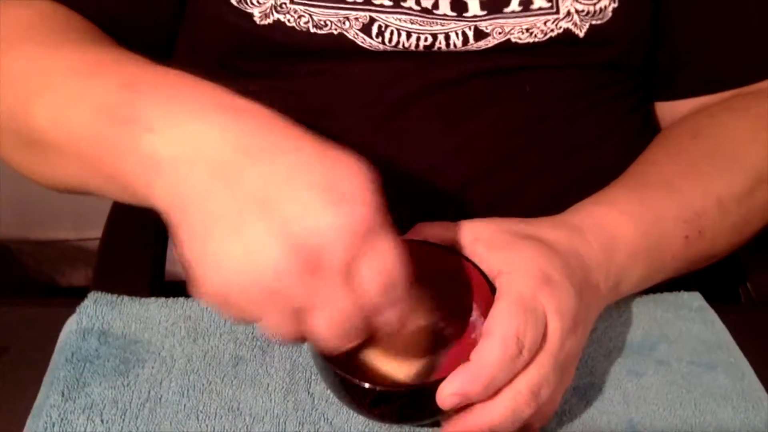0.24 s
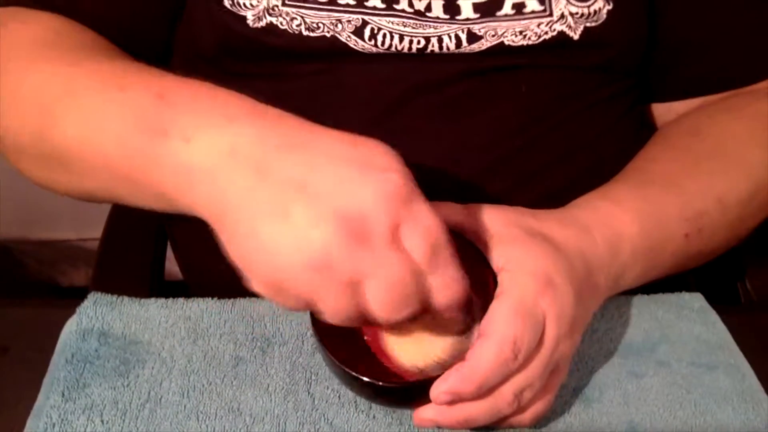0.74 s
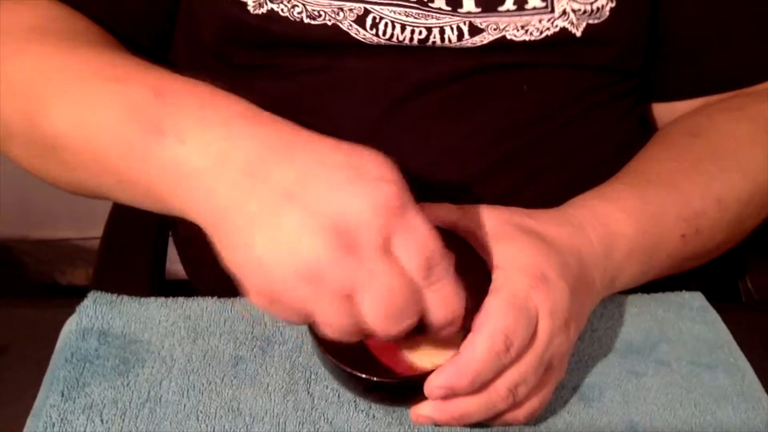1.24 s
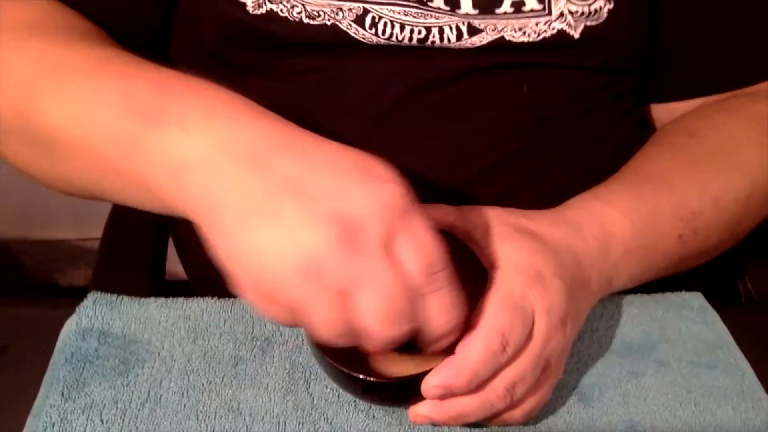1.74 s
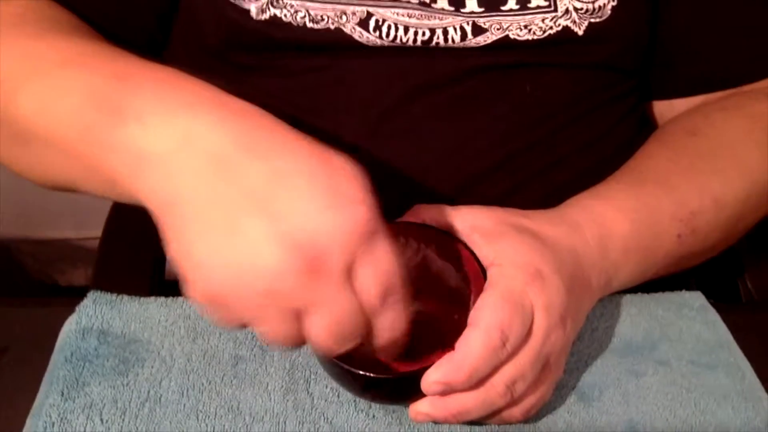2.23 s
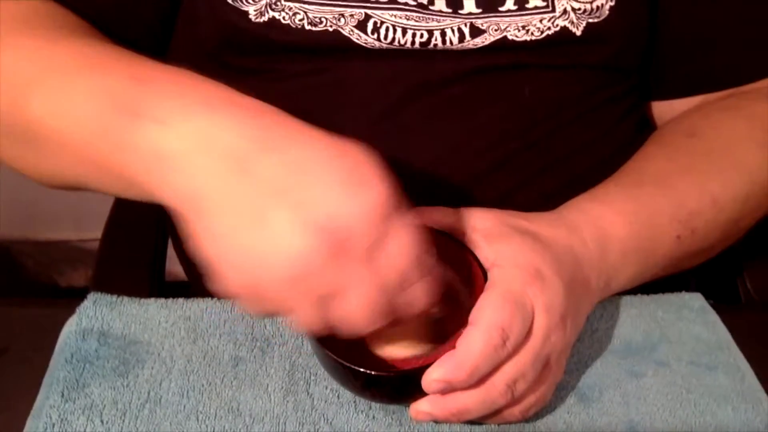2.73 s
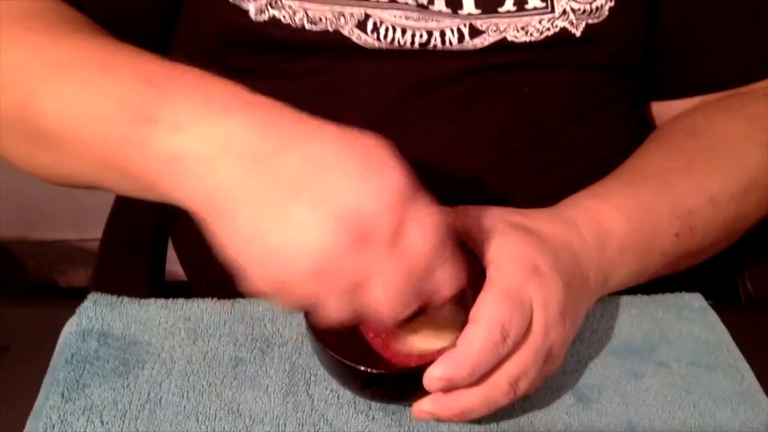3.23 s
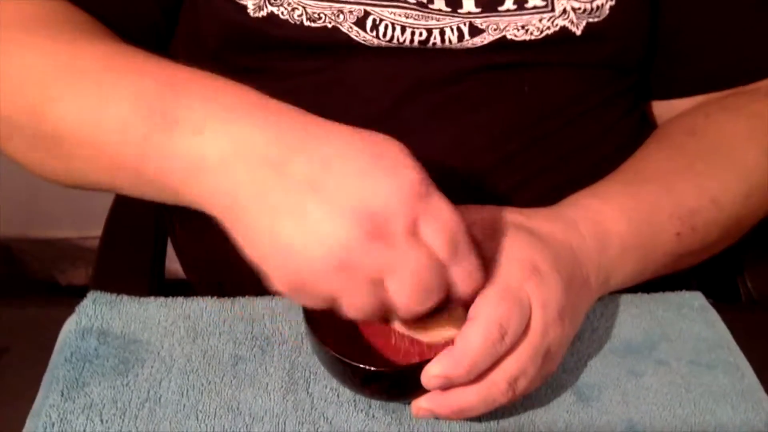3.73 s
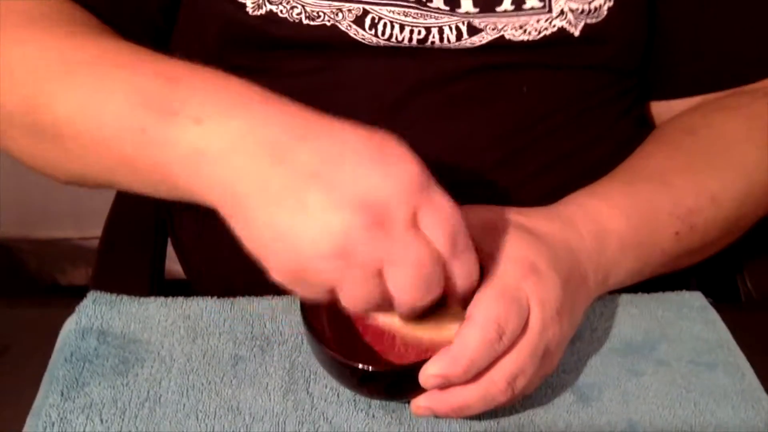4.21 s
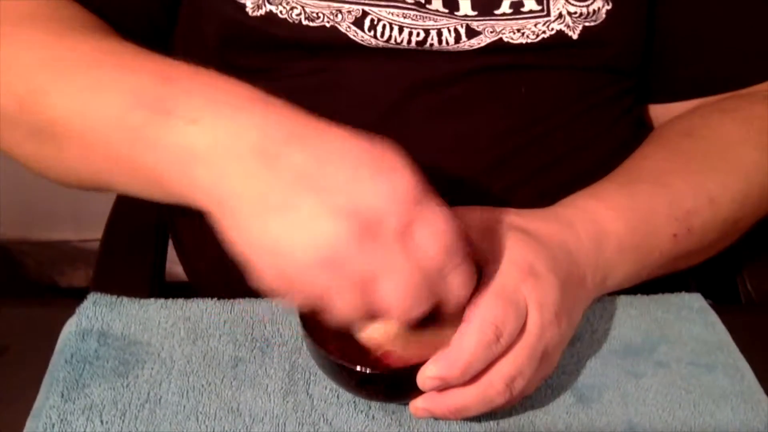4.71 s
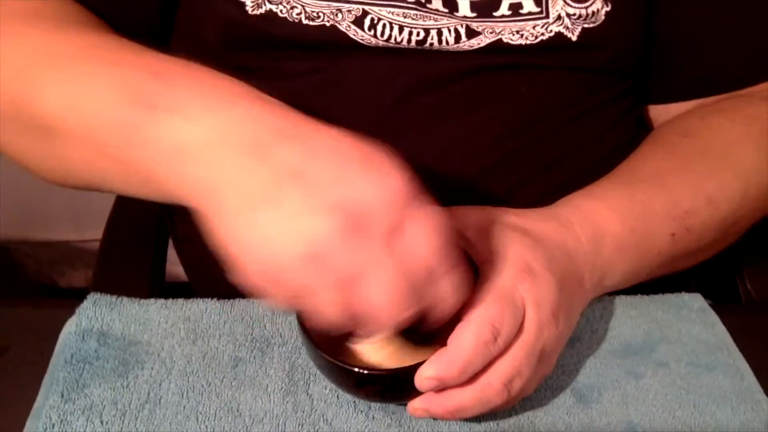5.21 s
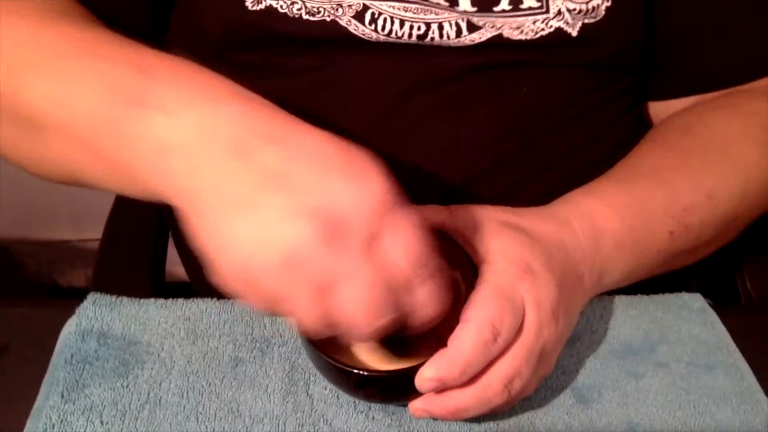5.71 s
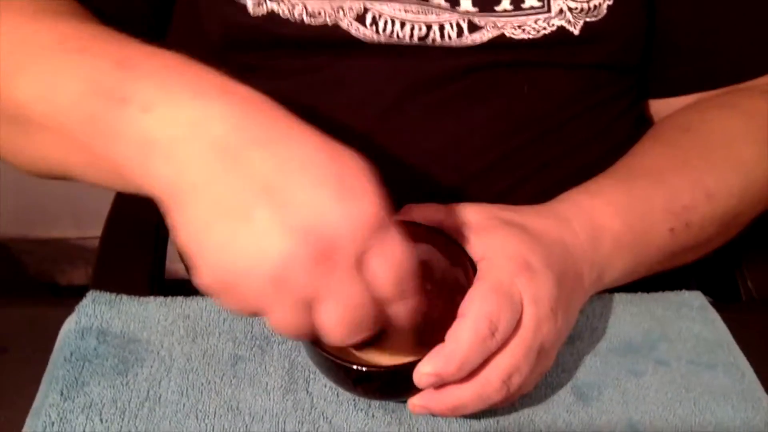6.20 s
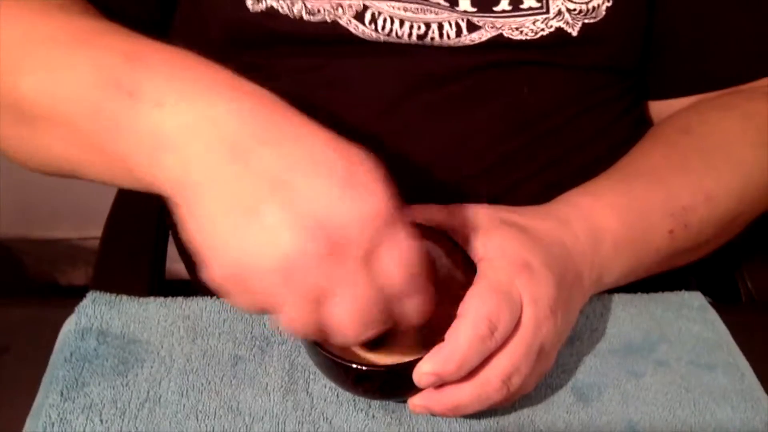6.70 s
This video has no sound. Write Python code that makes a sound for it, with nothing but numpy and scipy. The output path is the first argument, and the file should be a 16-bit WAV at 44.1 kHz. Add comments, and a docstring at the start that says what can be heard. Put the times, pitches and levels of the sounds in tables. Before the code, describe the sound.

A wet shaving brush swirls in a small bowl for about seven seconds, close and quiet. The bristles rub steadily, slightly louder at the very start, with two light, airy swishes per turn at nearly four turns a second. Faint lather ticks are scattered throughout. At 1.2 seconds the handle knocks the rim sharply and the bowl rings briefly; this is the loudest sound. A tiny, bright double chink follows at 1.6. A duller knock lands at 2.3, then a very faint, thin wet squeak at 2.6. Two more knocks come at 4.1 and 4.7. The bowl occasionally bumps softly on the towel-covered table, and from about 5.2 seconds to the end these muffled bumps come with nearly every turn. A small hard room gives the hits a very short echo. Soft hiss and a faint, distant motor whine continue behind everything.

```python
"""A wet brush swishes round a small hand-held bowl on a towel, two flicks of bristle to a turn.
Under the flicks the hairs drag steadily; lather ticks, the hand bumps the bowl softly on the table,
and four times the handle knocks the rim and sets the bowl ringing. A tiny double chink and one wet
squeak slip in. A small hard room answers the hits briefly; behind it all, hiss and a faint far motor."""
import sys
import numpy as np
from scipy import signal
from scipy.fft import rfft, irfft
from scipy.io import wavfile

SR = 44100
rng = np.random.default_rng(int(sys.argv[2]) if len(sys.argv) > 2 else 0)


def persist_wave(psi):
    """Save psi, clipped to +-1, as 16-bit WAV."""
    counts = np.round(np.clip(psi, -1, 1) * 32767).astype(np.int16)
    wavfile.write(sys.argv[1], SR, np.atleast_2d(counts).T)


N = 306531


def from_db(db):
    """Decibels to gain."""
    return 10 ** (np.asarray(db) / 20)


def rms_one(x):
    """Scale to rms 1."""
    return x / np.sqrt(np.mean(x ** 2) + 1e-20)


def in_time(rows):
    """Breakpoints, seconds first, drawn out into one curve for each further column."""
    times, *columns = np.transpose(rows)
    return [np.interp(np.arange(N) / SR, times, column) for column in columns]


def drift(rate_hz):
    """A smooth random wander of rms about 1."""
    hop = 40
    pole = np.exp(-2 * np.pi * hop * rate_hz / SR)
    slow = signal.lfilter([1], [1, -2 * pole, pole * pole], rng.standard_normal(N // hop + 2002))[2000:]
    return np.interp(np.arange(N) / hop, np.arange(len(slow)), rms_one(slow))


def coloured(white, spectrum):
    """Shape white noise with an EQ curve; rms 1."""
    hz, db = np.transpose(spectrum)
    bins_hz = np.maximum(np.arange(N // 2 + 1) * SR / N, 1)
    gain = from_db(np.interp(np.log(bins_hz), np.log(hz), db))
    return rms_one(irfft(rfft(white) * gain, N))


def add_ring(out, start_s, db, hz, t60, rise_s):
    """Mix in one sine that swells while the contact lasts, then dies away."""
    at = round(start_s * SR)
    t = np.arange(min(SR // 4, N - at)) / SR
    swell = np.sin(np.pi / 2 * np.minimum(t / rise_s, 1)) ** 2
    decay = from_db(db - 60 * np.maximum(t - rise_s, 0) / t60)
    out[at:at + len(t)] += decay * swell * np.sin(2 * np.pi * hz * t)


def room_hiss():
    """The steady, soft hiss of a quiet room."""
    # Colour of the hiss. Each row: frequency in Hz, relative level in dB.
    hiss_colour = [(18, -54), (30, -21.5), (137, -3), (579, 0), (880, -7), (2260, -2), (2860, -8),
                   (3350, -9), (3720, -6), (4470, -13), (6970, -22.5), (15700, -30.5)]
    return from_db(-61) * coloured(rng.standard_normal(N), hiss_colour)


def far_motor():
    """A distant motor slows a little, whining on a few wavering multiples of its rotation."""
    # Motor speed. Each row: time in seconds, rotation in Hz.
    speed = [(0, 147.1), (3.5, 145.6), (6.95, 144.2)]
    # Thin lines of the whine. Each row: multiple of the rotation, level in dB.
    whine_lines = [(18, -75), (19, -78), (20, -73), (21, -75.5)]
    phase = 2 * np.pi * np.cumsum(in_time(speed)[0]) / SR
    return sum(from_db(db + 1.5 * drift(2)) * np.sin(k * phase) for k, db in whine_lines)


def room_answer(x):
    """A small hard room: fast-fading reflections, the treble dying sooner, and one near wall's echo."""
    low_hz, treble_hz = 436, 2040
    build_s, middle_t60_s, treble_t60_s, echo_s = 0.0075, 0.13, 0.099, 0.0105
    t = np.arange(SR // 4) / SR
    dense = rng.standard_normal((2, len(t))) * np.clip(t / build_s, 0, 1) ** 2
    middle = signal.sosfilt(signal.butter(2, [low_hz, treble_hz], "band", fs=SR, output="sos"), dense[0])
    treble = signal.sosfilt(signal.butter(2, treble_hz, "high", fs=SR, output="sos"), dense[1])
    # the tail answers only in the middle and treble
    tail = middle * from_db(-60 * t / middle_t60_s) + treble * from_db(3 - 60 * t / treble_t60_s)
    tail *= from_db(-10) / np.sqrt(np.sum(tail ** 2))
    tail[round(echo_s * SR)] += from_db(-17)
    return signal.fftconvolve(x, tail)[:N]


def wet_squeak():
    """One thin wet squeak, sagging in pitch."""
    # Path of the squeak. Each row: time in seconds, pitch in Hz, level in dB.
    path = [(2.54, 7400, -90), (2.555, 7300, -74), (2.6, 7280, -75), (2.625, 7200, -88)]
    hz, db = in_time(path)
    t = np.arange(N) / SR
    sounding = (t > path[0][0]) & (t < path[-1][0])
    return sounding * from_db(db) * np.sin(2 * np.pi * np.cumsum(hz) / SR)


def lather_ticks():
    """Each tick is a cluster of seven tiny bubbles bursting a moment apart."""
    # Ticks. Each row: start in seconds, level in dB, centre pitch in Hz, pitch scatter as a share.
    clusters = [(.367, -64.5, 10160, .04), (.682, -63, 5950, .04), (.685, -67, 9800, .15),
                (1.494, -67, 10100, .03), (1.636, -61.5, 6030, .04), (2.474, -64, 6200, .06),
                (2.735, -64, 6030, .04), (3.276, -60, 5840, .08), (3.292, -61, 6000, .1),
                (4.09, -53.5, 5350, .25), (4.104, -62, 6230, 0.046), (4.632, -57, 5560, .06),
                (4.65, -51, 6310, .06), (4.915, -65, 6100, .05), (5.2, -63, 6200, .06),
                (5.425, -62, 6380, 0.086), (5.497, -64, 6000, .08), (5.683, -67, 9970, .12)]
    out = np.zeros(N)
    for start_s, db, hz, scatter in clusters:
        for pitch, late in rng.random((7, 2)):
            bubble_hz = hz * (1 + scatter * (2 * pitch - 1))
            add_ring(out, start_s + 0.0083 * late ** 2, db - 6, bubble_hz, t60=0.034, rise_s=0.0015)
    return out


def chinks():
    """Something small and hard chinks twice, almost as one."""
    # The two contacts. Each row: start in seconds, level in dB.
    contacts = [(1.565, -45), (1.5695, -43.5)]
    # Their bright ring. Each row: frequency in Hz, relative level in dB, t60 in seconds.
    chink_modes = [(6200, -18, .02), (8000, -4, 0.018), (8900, 3.5, 0.026), (9100, 0, 0.023),
                   (11000, -13, .02), (15300, -24, .02)]
    out = np.zeros(N)
    for start_s, level in contacts:
        for hz, db, t60 in chink_modes:
            add_ring(out, start_s, level + db, hz, t60, rise_s=0.0015)
    return out


def bowl_bumps():
    """The hand bumps the bowl on the table, each bump dulled by the towel."""
    # Soft bumps. Each row: start in seconds, level in dB, pitch in Hz.
    bumps = [(0.304, -51, 254), (1.488, -46, 640), (1.502, -48, 667), (1.957, -53, 286), (3.037, -51, 124),
             (3.044, -54.5, 226), (3.636, -55, 300), (5.167, -55.5, 137), (5.41, -51, 153),
             (5.411, -51.5, 260), (5.686, -52.5, 249), (5.938, -50.5, 274), (6.191, -52, 252),
             (6.436, -49, 247), (6.575, -54, 239), (6.68, -52, 272), (6.926, -43, 280)]
    out = np.zeros(N)
    for start_s, db, hz in bumps:
        add_ring(out, start_s, db, hz, t60=0.031, rise_s=1.62 / hz)
    return out


def handle_knocks():
    """The handle strikes the rim, ringing table and bowl in shares set by the spot struck."""
    # Blows on the rim. Each row: start in seconds, levels in dB of table, base, wall, ring, rim,
    # clink and glaze, contact time in seconds.
    blows = [(1.1944, -20.5, -26, -18.5, -16, -24, -32.5, -28, .0016),
             (2.2943, -25, -31, -46, -29, -32, -42, -55.5, 0.0034),
             (4.1417, -27.5, -34.5, -29, -40, -32.5, -56.5, -59, 0.0026),
             (4.674, -23.5, -32.5, -31.5, -32, -29, -49, -53, 0.0026)]
    # Modes of those seven parts. Each row: frequency in Hz, relative level in dB, t60 in seconds.
    part_modes = {"table": [(134.7, -6, 0.1), (218, -1, 0.067)], "base": [(338.5, 4, 0.04),
                  (461, 3.5, 0.024)], "wall": [(531, 4, 0.021), (700, -4, 0.023)],
                  "ring": [(838, -3, 0.031), (883, -2, 0.023), (1002, -21.5, 0.19), (1148, -9, 0.034)],
                  "rim": [(1312, 3, 0.022), (1375, -7.5, 0.043), (1570, -11.5, 0.045), (1930, -23, 0.029)],
                  "clink": [(4720, 0.5, 0.0086), (6330, 2, 0.019), (6530, -16, 0.02), (6800, -3, 0.021),
                  (7310, -6, 0.035), (8170, -6.5, 0.026), (8680, -5.5, 0.018)], "glaze": [(2397, -7, 0.016),
                  (3620, -1.5, 0.02), (5200, -2, 0.021), (5730, 1, 0.011), (9900, -10, 0.016),
                  (10880, -17, .014), (12900, -33, .012), (14300, -33, .012)]}
    out = np.zeros(N)
    for start_s, *levels, contact_s in blows:
        for part, level in zip(part_modes.values(), levels):
            for hz, db, t60 in part:
                add_ring(out, start_s, db + level, hz, t60, contact_s + 0.084 / hz)   # lows swell longer
    return out


def bristles(spectrum, slips_per_s, spread_db, flutter_db):
    """Dense slips of single hairs, uneven in size, their overall level fluttering."""
    sizes = from_db(spread_db * np.minimum(rng.exponential(1, N), 4)) * rng.standard_normal(N)
    slips = sizes * (rng.random(N) < slips_per_s / SR)
    return from_db(flutter_db * drift(14.4)) * coloured(slips, spectrum)


def brush_drag():
    """The bristles drag round the bowl, starting louder and settling to a steady rub."""
    # Colour of the drag. Each row: frequency in Hz, relative level in dB.
    drag_colour = [(24, -54), (40, -29), (128, 2), (167, 0), (280, -1), (370, -1), (583, -2.5), (842, -7.5),
                   (1300, -5), (1480, -7), (2950, -8), (3360, -19.5), (3740, -10), (4350, -8.5),
                   (7000, -25), (9100, -29.5), (15400, -120)]
    steady_db, start_boost_db, settle_s = -61.5, 7.5, 0.1
    level = from_db(steady_db + start_boost_db * np.exp(-np.arange(N) / SR / settle_s))
    return level * bristles(drag_colour, slips_per_s=12000, spread_db=0.5, flutter_db=1.48)


def brush_flicks():
    """The bristles flick the wall twice a turn in bell-shaped swells: a swish, then an airier one."""
    # Turns of the brush. Each row: time in seconds, first flick in dB, second flick in dB.
    turns = [(0.0, -74, -73), (.268, -80, -78), (.55, -79, -78), (.842, -76, -71), (1.122, -74.5, -70),
             (1.377, -77, -72), (1.648, -73, -71), (1.945, -79, -74), (2.2, -84, -73), (2.48, -77, -78),
             (2.754, -76, -73.5), (3.028, -74, -76), (3.292, -72, -79), (3.55, -80, -75), (3.834, -78, -86),
             (4.097, -71, -82), (4.367, -76, -86), (4.658, -68.5, -84), (4.92, -75, -84), (5.142, -77, -82),
             (5.407, -74, -79), (5.687, -72, -84), (5.9, -77, -84), (6.15, -78, -81), (6.425, -79, -86),
             (6.655, -75.5, -83), (6.885, -77, -84)]
    # Colours of the first and second flick. Each row: frequency in Hz, relative level in dB.
    swish_colour = [(3000, -19), (5000, -11), (6300, 5), (8000, -4), (10000, 2), (12000, -11), (14000, -10),
                    (15700, -8)]
    airy_colour = [(3000, -15), (5000, -12), (6300, 0), (8000, -4), (10000, 0), (12000, -8), (14000, -8),
                   (15700, -3)]
    t = np.arange(N) / SR
    turn_s, first_db, second_db = np.transpose(turns)

    def flick(colour, levels, delay_s, length_s):
        """One flick of every turn; overlapping swells add in power."""
        power = sum(from_db(2 * db - 11 * (2 * (t - s - delay_s) / length_s) ** 2)
                    for s, db in zip(turn_s, levels))
        return np.sqrt(power) * bristles(colour, slips_per_s=3500, spread_db=3, flutter_db=0.8)

    first = flick(swish_colour, first_db, delay_s=0, length_s=0.045)
    second = flick(airy_colour, second_db, delay_s=0.11, length_s=0.054)
    return first + second


def scene():
    """Knocks and small sounds ring in the room, over dry brush, motor and hiss; mono."""
    struck = handle_knocks() + bowl_bumps() + lather_ticks() + chinks() + wet_squeak()
    # the hits' deep bass is rolled off, leaving a faint low thud
    hits = signal.sosfilt(signal.butter(4, 117, "high", fs=SR, output="sos"), struck)
    deep = from_db(-20) * signal.sosfilt(signal.butter(2, 60, fs=SR, output="sos"), struck)
    brush = brush_flicks() + brush_drag()
    return (room_hiss() + room_answer(hits) + far_motor() + deep + hits + brush)[None]


def record(dry):
    """A steep low-pass takes off the very top."""
    cutoff_hz = 15750
    return signal.sosfilt(signal.ellip(14, 0.5, 60, cutoff_hz, fs=SR, output="sos"), dry)


dry = scene()
out = record(dry)
persist_wave(out)
```